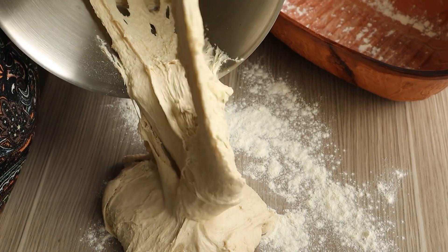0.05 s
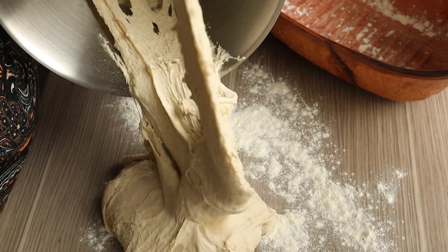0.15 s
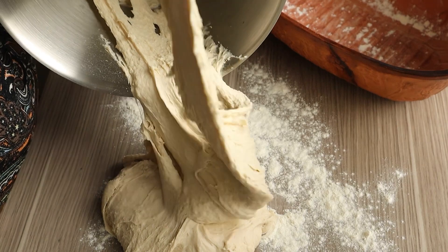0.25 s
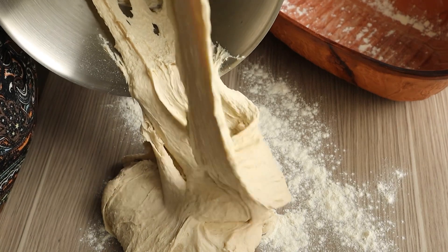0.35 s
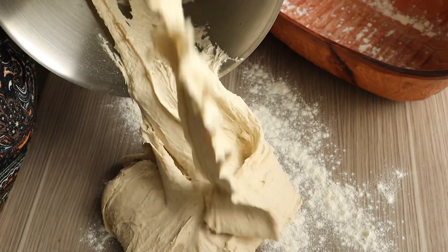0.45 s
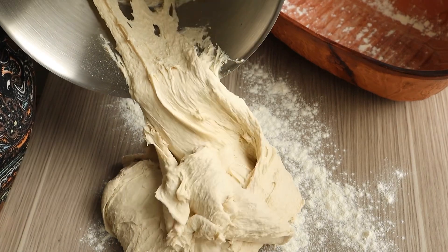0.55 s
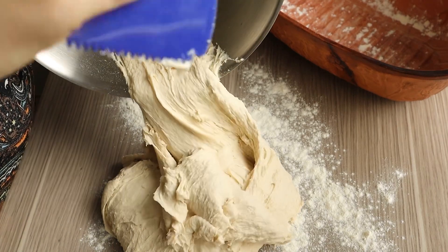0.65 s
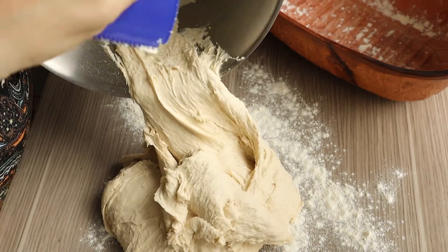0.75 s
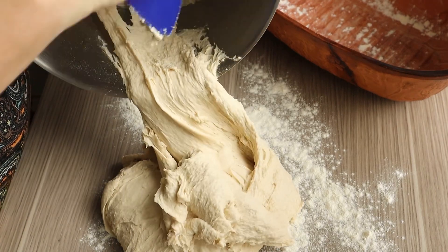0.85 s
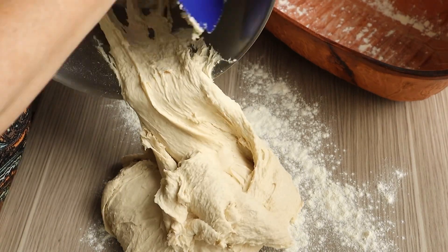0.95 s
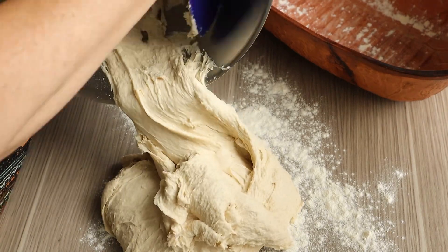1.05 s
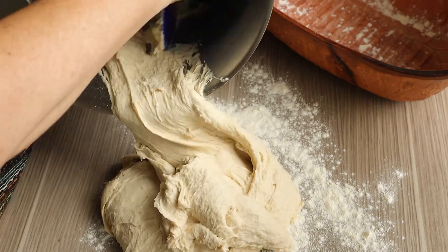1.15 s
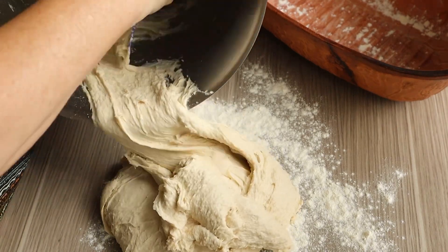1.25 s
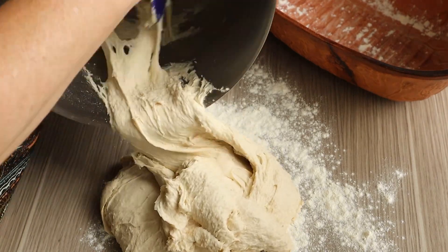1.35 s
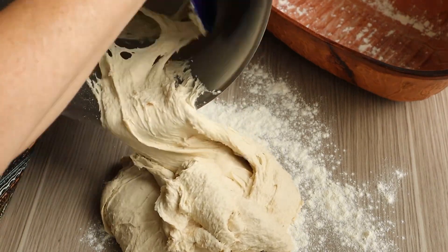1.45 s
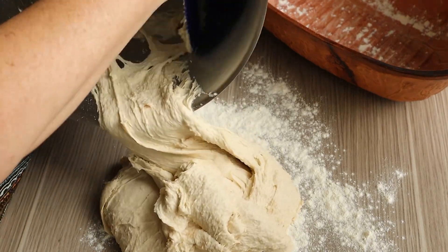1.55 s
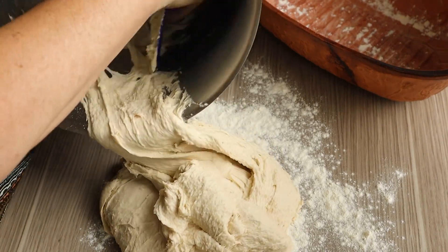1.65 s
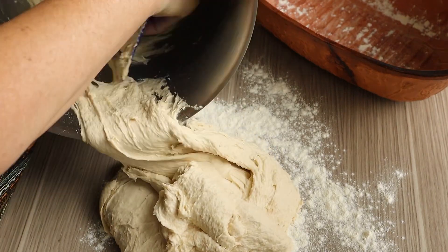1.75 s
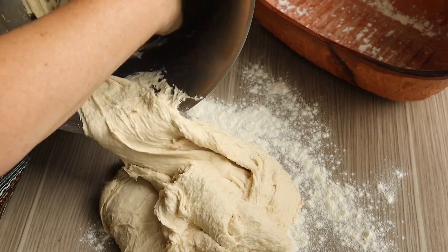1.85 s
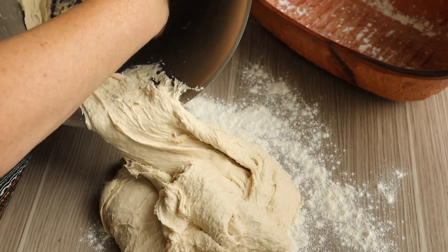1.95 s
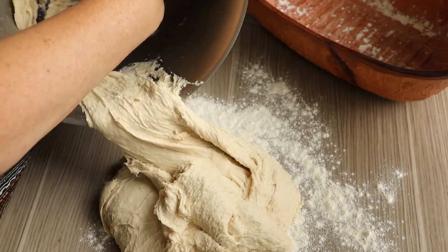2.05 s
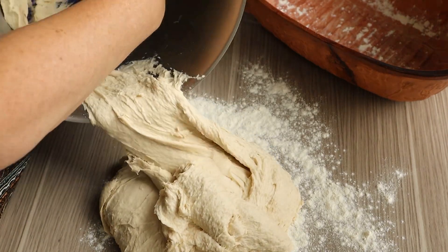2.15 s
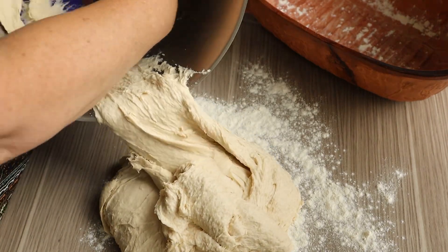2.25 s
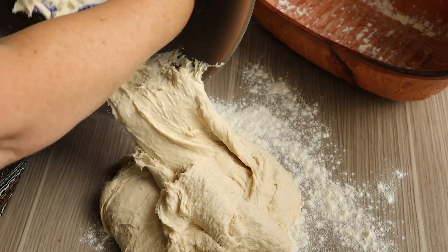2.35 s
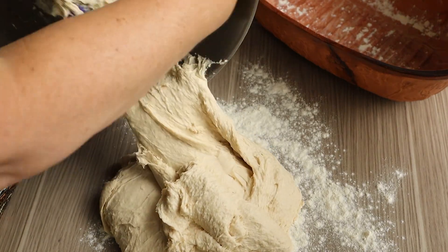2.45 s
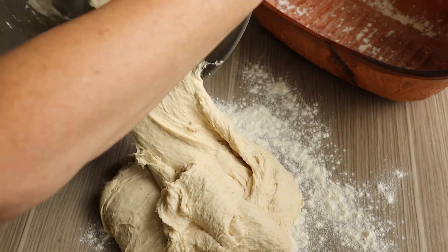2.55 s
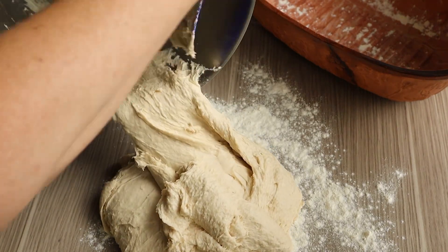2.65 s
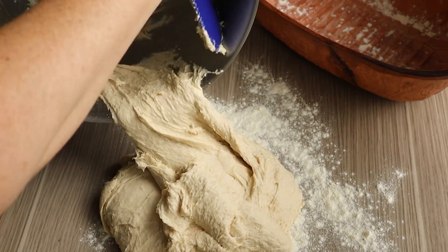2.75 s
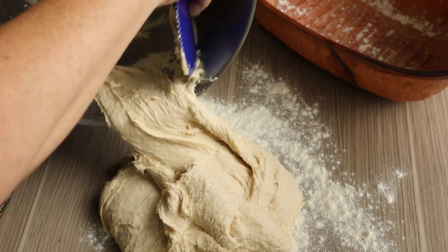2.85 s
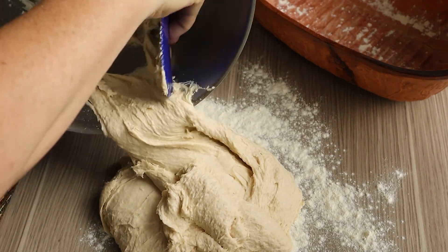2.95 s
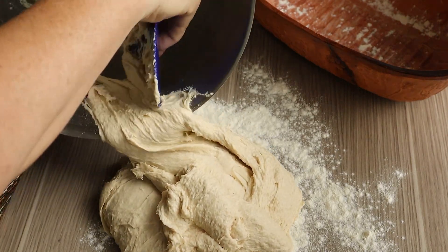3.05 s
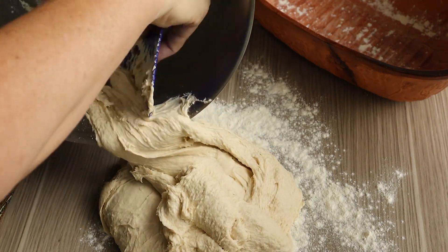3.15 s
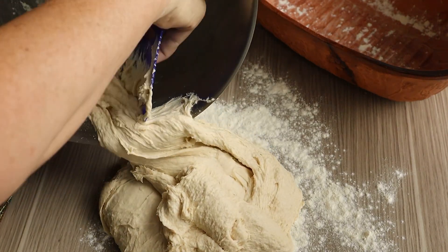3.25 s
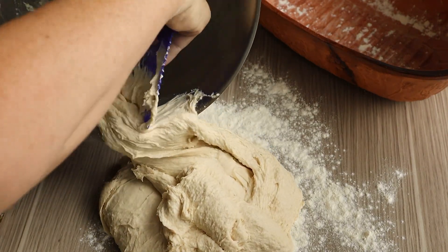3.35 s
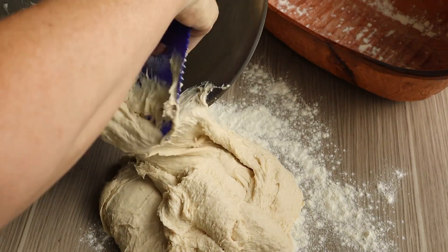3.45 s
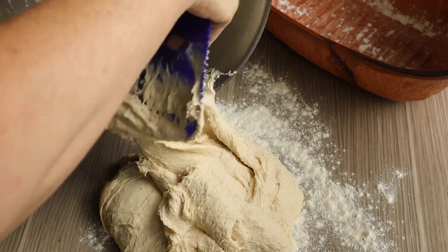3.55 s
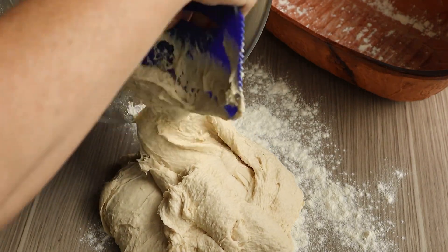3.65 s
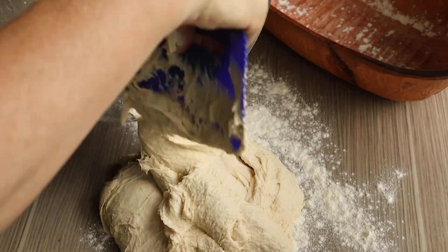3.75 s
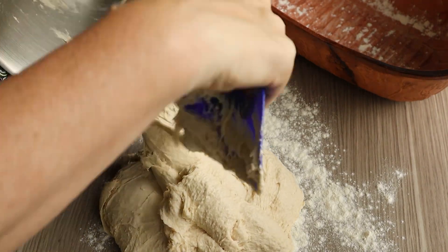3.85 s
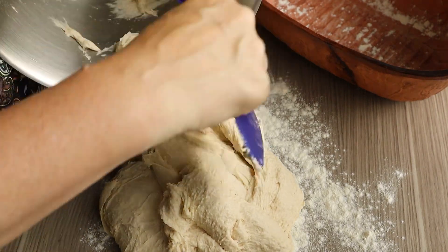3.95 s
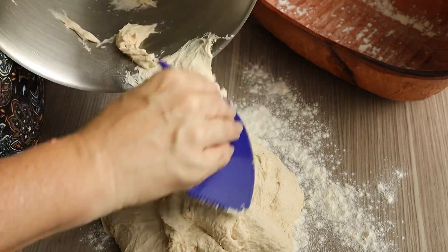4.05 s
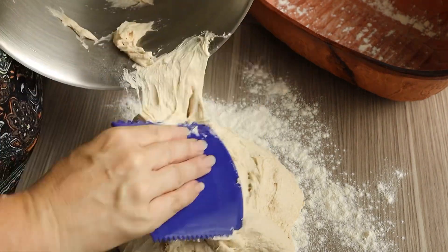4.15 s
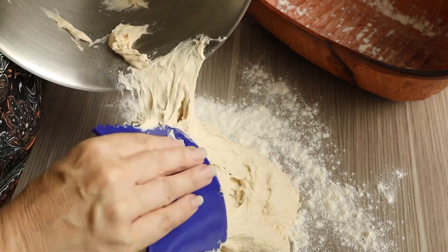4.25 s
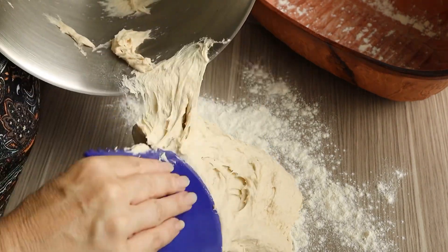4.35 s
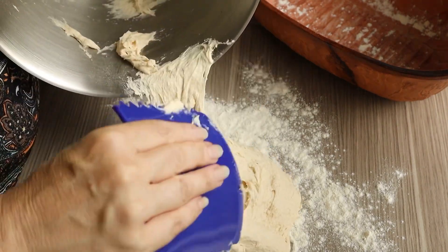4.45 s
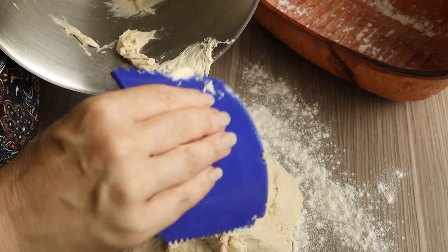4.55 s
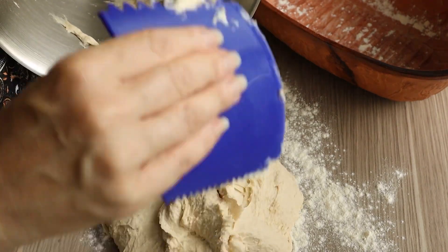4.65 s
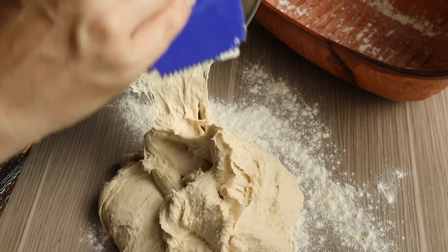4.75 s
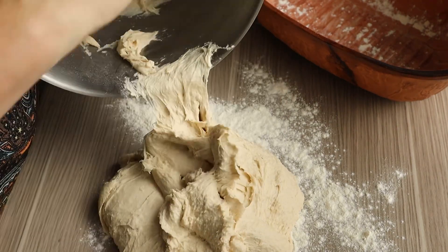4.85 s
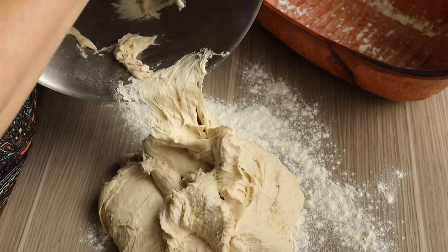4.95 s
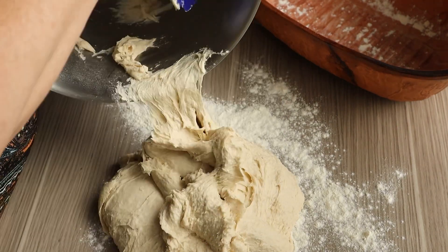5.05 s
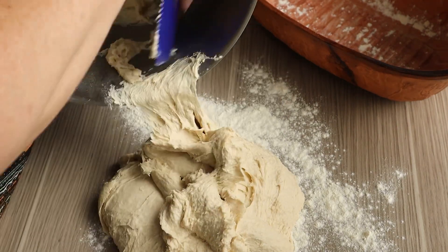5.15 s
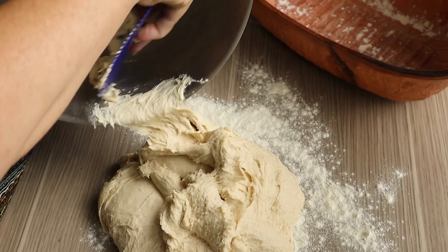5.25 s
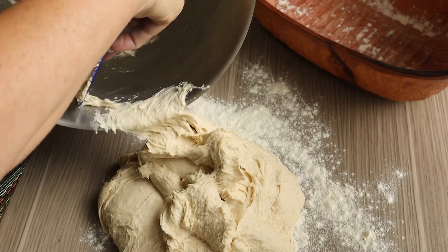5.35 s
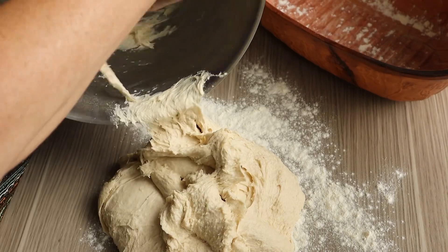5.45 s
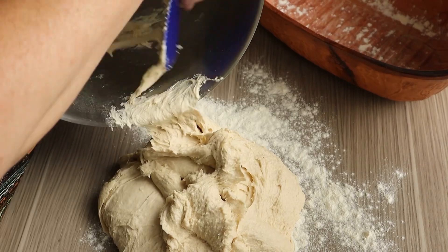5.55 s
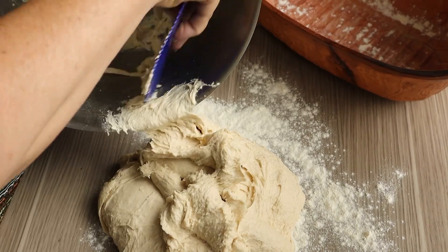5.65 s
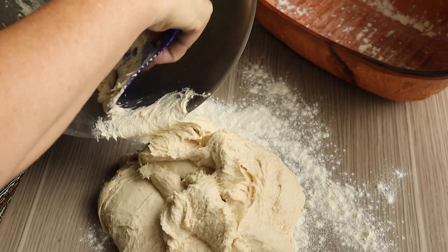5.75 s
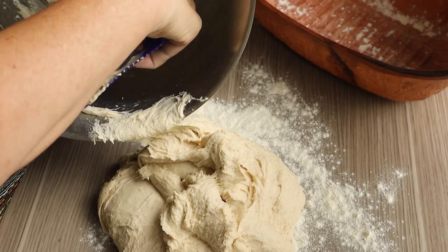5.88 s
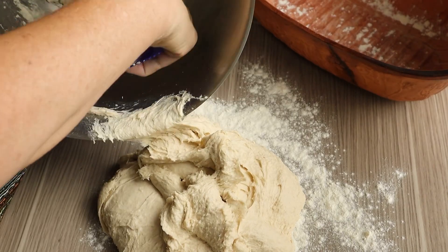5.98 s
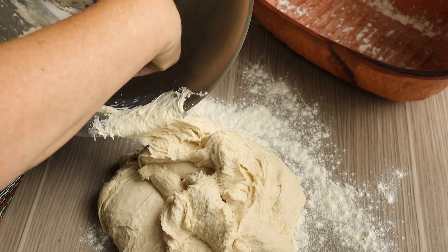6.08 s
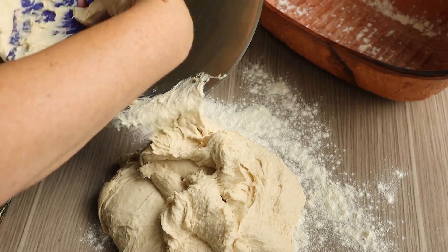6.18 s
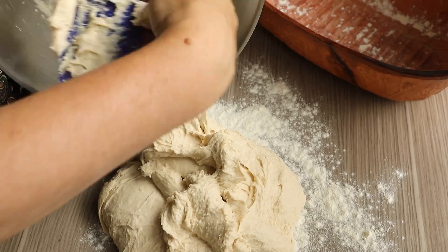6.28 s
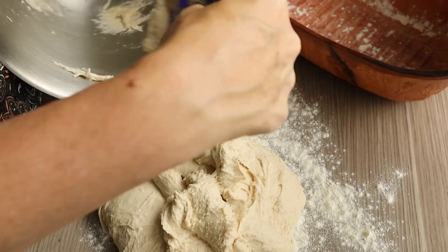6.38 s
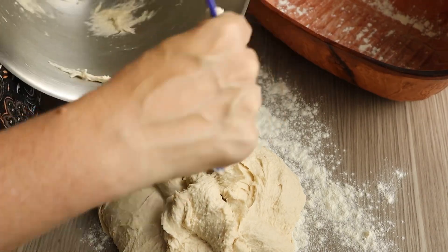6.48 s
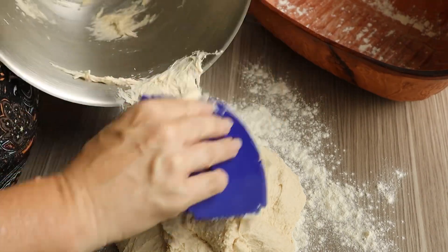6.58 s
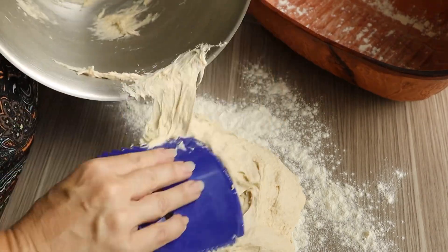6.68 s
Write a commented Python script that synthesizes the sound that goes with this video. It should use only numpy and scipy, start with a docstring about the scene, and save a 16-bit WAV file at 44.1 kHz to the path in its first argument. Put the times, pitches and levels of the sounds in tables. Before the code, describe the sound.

Close stereo pickup of dough being cleared from a thin steel bowl. First a soft thud and sticky tick on wood, then sharp knocks and grainy metallic scrapes, some wavering into rough notes. The longest scrape carries a faint deep shudder. The dough quietly squelches and crackles, then two more knock-and-scrape strokes come before a final wet press. Short room reflections and low air noise surround everything.

```python
"""A lump of sticky dough slaps down on a wooden table in a small kitchen, with a few wet ticks.
A scraper then clears a steel bowl: its blade knocks on the steel and drags along it in tiny random slips,
and both ring the same bowl modes. Between strokes the bowl groans once in the grip; a deep shudder follows.
Later the dough squelches and crackles (filtered random clicks), two more strokes follow, and a last squelch.
A faint crackle goes on from the slap to the end; coloured noise makes a steady room hush throughout."""
import sys
import numpy as np
from scipy import signal
from scipy.fft import rfft, irfft
from scipy.io import wavfile
from scipy.ndimage import uniform_filter1d

SR = 44100
rng = np.random.default_rng(int(sys.argv[2]) if len(sys.argv) > 2 else 0)


def log_audio(samples):
    """Write samples as a 16-bit WAV file to the path given in sys.argv[1]."""
    # one column per channel
    frames = np.atleast_2d(samples).T
    # limit to full scale, then quantise
    limited = np.clip(frames, -1, 1)
    pcm = np.round(limited * 32767).astype(np.int16)
    wavfile.write(sys.argv[1], SR, pcm)


N = 296352
T = np.arange(N) / SR  # seconds
FREQ = np.maximum(np.arange(N // 2 + 1) * SR / N, 1)  # Hz, kept above 0 for the log axis

# Modes of the bowl, damped by hand and dough.
# Each row: pitch in Hz, width in Hz, height in dB over the shell response.
BOWL_MODES = [(159, 19, 19), (312, 3.3, 6), (345.4, 16, 19.5), (536, 34, 13.5), (702, 45, 15.5),
              (905, 54, 12.5), (1044, 98, 11.5), (1118, 79, 13.5), (1308, 19, 9), (1590, 166, 9.5),
              (1620, 40, 0), (1958, 25, 11), (2189, 40, 7), (2368, 21, 6.5), (2573, 23, 8), (2684, 54, 6.5),
              (3002, 51, 8), (3540, 69, 6), (3900, 60, 0.5), (4310, 54, 1), (5120, 110, -2),
              (5260, 100, -4), (6780, 430, -1), (7520, 460, -1)]
# Dense response of the thin steel shell. Each row: frequency in Hz, response in dB.
SHELL_RESPONSE = [(50, -35.5), (120, -6), (220, -1), (430, -0.5), (620, -2.5), (1200, 1), (2600, 2),
                  (5000, 1), (8200, -1), (9500, -5), (12000, -9), (15000, -46)]
# Stereo width of the bowl and dough. Each row: frequency in Hz, gain of the side signal in dB.
BOWL_SIDE = [(150, -27), (400, -14), (1000, -5.5), (2000, 0.5), (4000, 4), (8000, 4.5), (12000, 11.5)]
# Strokes of the blade, one list a stroke; levels before the settings in scraping().
# Each row: time in seconds, bite of the edge in dB, pressure on the wall in dB.
BLADE_STROKES = [
    [(1.06, -33, -35), (1.106, -33, -44), (1.148, -35.5, -46), (1.166, -35.5, -40), (1.248, -54, -44),
     (1.278, -46.5, -51), (1.3, -57, -66)],
    [(1.6, -48, -58), (1.63, -38.5, -46), (1.655, -38.5, -40), (1.695, -50, -44.5), (1.74, -46.5, -38),
     (1.78, -46.5, -46), (1.888, -38, -39.5), (2.008, -52, -53), (2.1, -58, -50.5)],
    [(2.13, -56, -50), (2.282, -48, -45), (2.292, -50.5, -47), (2.326, -36.5, -40.5), (2.406, -57.5, -62),
     (2.44, -54, -71)],
    [(2.79, -43, -52), (2.815, -38.5, -45), (2.868, -37, -34), (2.908, -33.5, -39), (3.002, -52, -47.5),
     (3.13, -47, -44.5), (3.24, -48, -46.5), (3.276, -45, -46), (3.48, -43, -37.5), (3.52, -47.5, -52),
     (3.58, -59, -68)],
    [(5.18, -35.5, -52), (5.206, -34, -39), (5.256, -47.5, -40.5), (5.282, -35.5, -39.5), (5.334, -40, -40),
     (5.41, -61.5, -52.5)],
    [(5.68, -41, -50.5), (5.862, -44.5, -41.5), (5.9, -47.5, -53), (5.946, -42, -41.5), (5.99, -50.5, -51),
     (6.086, -38, -38), (6.155, -43, -46), (6.174, -38, -43), (6.19, -43.5, -57), (6.26, -68, -76)],
]
# Each stroke meets another part of the wall.
# Each row: rumble in dB over the pressure, rasp in dB over the bite, hiss in dB over the bite.
STROKE_BALANCE = [(-4, -2, -5), (-12, -2, -5.5), (-4.5, -4.5, -0.5), (-7, -4.5, -3.5), (-11.5, -1.5, -5),
                  (-11, -3.5, -3)]
# Resonances brought out where the blade presses, one list a stroke.
# Each row: pitch in Hz, width in Hz, height in dB.
STROKE_RESONANCES = [
    [(736, 56, 1), (1970, 50, 3), (2360, 130, 6), (2960, 90, 6.5), (3730, 400, 1.5)],
    [(940, 56, 10), (1420, 130, 6.5), (2670, 60, -5)],
    [(930, 74, 6), (1460, 130, 3), (2590, 310, 4)],
    [(760, 90, 2.5), (960, 110, 4.5), (1580, 72, 2.5), (1880, 150, 2), (2690, 43, -1), (3050, 140, 3.5)],
    [(738, 90, 6.5), (1540, 110, -2), (1950, 63, 2.5), (2600, 81, -4), (2905, 62, 6.5)],
    [(910, 230, 5), (1550, 90, 5.5), (2650, 75, -1), (3060, 210, 4.5)],
]
# Knocks on the bowl; thump, body and tick are levels before the settings in knocks().
# Each row: start in seconds, thump in dB, body in dB, tick in dB, main pitch of the struck spot in Hz,
# contact ring in seconds to fall 60 dB, boom in dB, favoured ring in Hz, ring in dB.
BOWL_KNOCKS = [(1.0471, -38.5, -61, -30, 2300, 0.15, -45, 2700, -45),
               (1.1647, -45, -38.5, -31.5, 1110, 0.26, -35.5, 2000, -32),
               (1.5178, -36.5, -22, -21.5, 1530, 0.094, -38, 2960, -21.5),
               (2.2922, -56, -43, -59, 950, 0.052, -61, 1020, -37),
               (2.7732, -44.5, -64, -54, 1130, 0.11, -44, 1020, -62),
               (5.071, -52, -39, -62, 1200, 0.047, -56, 1020, -48),
               (5.1514, -32.5, -30.5, -27, 1060, 0.15, -50, 2600, -38),
               (5.6348, -32.5, -29.5, -36, 1080, 0.34, -30, 1860, -25)]
# The hollow of the bowl booms after a shove. Each row: pitch in Hz, level in dB, seconds to fall 60 dB.
HOLLOW_BOOM = [(305.4, -2, 0.17), (358, 0.5, 0.11)]
# Modes of the free wall after a knock. Each row: pitch in Hz, level in dB, seconds to fall 60 dB.
WALL_RING = [(1023, -4, 0.22), (1270, 0, 0.26), (1943, 0, 0.25), (2207, -7, 0.13), (2600, -3, 0.3),
             (2751, -1, 0.15), (2972, -6, 0.22), (3580, -5, 0.17)]
# The blade judders on one bowl mode.
# Each row: centre in seconds, length in seconds, mode in Hz, level in dB.
BLADE_JUDDERS = [(1.097, 0.0235, 1986, -32.5), (1.177, 0.018, 1058, -42), (1.206, 0.02, 964, -41.5),
                 (1.242, 0.02, 938, -41.5), (1.97, 0.11, 1533, -54.5), (2.17, 0.098, 1524, -54.5),
                 (2.224, 0.06, 919, -52), (2.862, 0.054, 737, -44), (2.891, 0.044, 1989, -37),
                 (3.418, 0.066, 732, -49.5), (4.874, 0.009, 1720, -48.5), (5.826, 0.05, 3054, -43.5),
                 (5.978, 0.087, 950, -45.5), (6.11, 0.071, 1500, -46)]
# The note that the bowl holds under the second stroke. Each row: time in seconds, pitch in Hz, level in dB.
HELD_NOTE = [(1.735, 925, -38.5), (1.765, 920, -45), (1.83, 925, -43.5), (1.868, 917, -46),
             (1.898, 913, -36.5), (1.97, 918, -45), (2.04, 930, -52), (2.08, 915, -48), (2.124, 921, -53)]
# The dough slapping down on the table. Each row: frequency in Hz, relative level in dB per Hz.
SLAP_SPECTRUM = [(60, -33), (160, 1.5), (350, 0), (450, -5), (560, -1), (930, 0), (1250, 4.5), (2000, -6),
                 (2800, -18), (7500, -25), (13000, -68)]
# Dough pressed and torn; levels before the settings in dough().
# Each row: fullest moment in seconds, pitch of the squelch in Hz, squelch in dB, crackle in dB.
DOUGH_SQUEEZES = [(4.44, 690, -47.5, -61.5), (4.495, 646, -59, -57), (4.868, 1500, -53.5, -67),
                  (6.644, 1460, -56, -84)]
# Short ticks, mostly where sticky dough lands, is touched or snaps; the one at 5.071 s is the crisp tick of a
# knock on the bowl. # Each row: start in seconds, level in dB before the setting in dough().
SHORT_TICKS = [(0.545, -46), (0.559, -35.5), (0.5732, -23.5), (2.5865, -35), (4.77, -39), (4.857, -44),
               (4.875, -41.5), (4.9453, -43), (5.071, -32.5), (6.64, -49)]
# Tone of those ticks. Each row: frequency in Hz, relative level in dB per Hz.
SNAP_SPECTRUM = [(500, 18), (2000, 2.5), (7000, 3), (12000, -4), (16000, -28)]
# Room air. Each row: frequency in Hz, relative level in dB per Hz.
AIR_SPECTRUM = [(20, 1.5), (33, -21), (52, 8.5), (75, 0.5), (110, 0.5), (170, -0.5), (400, -5.5),
                (800, -8.5), (1500, -14), (3000, -18.5), (6000, -28), (9500, -33.5), (12500, -34.5),
                (15000, -59)]
# Stereo width of the air. Each row: frequency in Hz, gain of the side signal in dB.
AIR_SIDE = [(60, -17), (110, -6), (200, 0), (380, 4.5), (700, 3.5), (1290, 5), (2380, 5), (4400, 5.5),
            (8120, 7), (15000, 13)]

# where the low body, the middle ring, the rasp and the hiss of the steel meet, and where all sound is cut
LOW_HZ, RASP_HZ, HISS_HZ, TOP_HZ = 830, 1780, 4200, 15300
# a harder bite is brighter: dB of hiss gained over the rasp for each dB above an ordinary bite
BRIGHTENING, ORDINARY_BITE_DB = 0.6, -41.5
RING_FALL_DB_PER_OCTAVE = 30  # modes far from the favoured one ring less
BOWL_LEAN = 0.086  # share by which the bowl is louder on the right and softer on the left
GROAN_S, GROAN_LENGTH_S, GROAN_HZ, GROAN_SAG_HZ_PER_S, GROAN_DB = 2.579, 0.029, 343, 980, -37
SLAP_S, SLAP_DB = 0.5715, -24.5
SQUEEZE_RISE_S, SQUEEZE_T60 = 0.034, 0.22
SQUELCH_SPREAD = 1.62  # ratio of the band's edges to its pitch
SHUDDER_S, SHUDDER_LENGTH_S, SHUDDER_HZ, SHUDDER_DB = 3.3, 0.24, 31.7, -51
HUSH_DB = -53


def undb(db):
    """Decibels to gain."""
    return 10 ** (np.asarray(db) / 20)


def unit(x):
    """Scale a (mid, side) pair so that the mid has rms 1."""
    return x / np.sqrt(np.mean(x[0] ** 2))


def spectrum(points):
    """dB at every frequency, joined on a log axis."""
    hz, db = np.transpose(points)
    return np.interp(np.log(FREQ), np.log(hz), db)


def peaks(modes):
    """dB response of resonances standing over a flat background."""
    power = sum(undb(db) ** 2 / (1 + (2 * (FREQ - hz) / width) ** 2) for hz, width, db in modes)
    return 10 * np.log10(1 + power)


def colour(x, db):
    """Filter with the given dB response that never sounds early: narrow peaks ring on after the push."""
    n = x.shape[-1]
    log_gain = np.interp(np.arange(n // 2 + 1) * SR / n, FREQ, db) * np.log(10) / 20
    # folding the cepstrum gives the phase that puts the energy as early as possible
    cepstrum = irfft(log_gain, n)
    cepstrum[1:n // 2] *= 2
    cepstrum[n // 2 + 1:] = 0
    return irfft(rfft(x) * np.exp(rfft(cepstrum)), n)


def widen(pair, width):
    """Set the side against the mid, frequency by frequency."""
    return np.array([pair[0], colour(pair[1], spectrum(width))])


def band(x, lo_hz, hi_hz, order=4):
    """Keep only the frequencies between two edges."""
    edges = [lo_hz, min(hi_hz, SR / 2 - 100)]
    return signal.sosfilt(signal.butter(order, edges, "band", fs=SR, output="sos"), x)


def fade(t, t60):
    """Exponential decay, 60 dB down at t60 seconds."""
    return np.exp(-np.log(1000) * t / t60)


def swell(centre_s, length_s):
    """Bell-shaped rise and fall."""
    return np.exp(-2 * ((T - centre_s) / length_s) ** 2)


def envelope(s, db, onset_s=0.01, release_s=0.04):
    """Gain over time of one gesture from its dB curve, silent before and after."""
    gate = np.interp(T, [s[0] - onset_s, s[0], s[-1], s[-1] + release_s], [0, 1, 1, 0])
    return undb(np.interp(T, s, db)) * gate


def walk(rate):
    """Smooth random wander with a spread of 1, from random steps at the given rate per second."""
    size = int(SR / rate)
    steps = np.repeat(rng.standard_normal(N // size + 1), size)
    smooth = uniform_filter1d(uniform_filter1d(steps, size), size)[:N]
    return smooth / smooth.std()


def slips(rate, spread_db):
    """Random tiny clicks of uneven size, about `rate` a second, as mid and side."""
    happens = rng.random(N) < rate / SR
    sizes = happens * undb(abs(spread_db) * np.clip(rng.standard_normal(N), -2, 2))
    return unit(sizes * rng.standard_normal((2, N)))


def tone(phase, side_db=-3, lead=0.62):
    """One mode of the wall as mid and side: it reaches the two ears out of step."""
    return np.array([np.sin(phase), -undb(side_db) * np.cos(phase + lead)])


def bowl(push, contact=()):
    """The steel's answer to a push: its modes and those of the contact, over the dense shell response."""
    response = spectrum(SHELL_RESPONSE) + peaks(BOWL_MODES) + peaks(contact)
    return widen(colour(push, response), BOWL_SIDE)


def patchy(steel, lo_hz, hi_hz, patchy_db=1.2, count=5):
    """The moving contact favours now one group of modes, now another."""
    edges = np.geomspace(lo_hz, hi_hz, count + 1)
    whole = rfft(steel)
    groups = (irfft(whole * ((FREQ >= lo) & (FREQ < hi)), N) for lo, hi in zip(edges, edges[1:]))
    return unit(sum(group * undb(patchy_db * walk(rate=45)) for group in groups))


def scraping(press_db=-5.5, grip_db=1.0, catch_db=1.0):
    """The blade slips unevenly: pressure drives the low modes, the edge's bite the rasp and hiss."""
    unevenness = undb(grip_db * walk(rate=130) + catch_db * walk(rate=40))
    steel = bowl(slips(rate=7000, spread_db=-1.5) * unevenness)
    rumble = unit(band(steel, 245, LOW_HZ))
    body = patchy(steel, LOW_HZ, RASP_HZ, count=3)
    rasp = patchy(steel, RASP_HZ, HISS_HZ)
    hiss = patchy(steel, HISS_HZ, TOP_HZ)
    out = np.zeros((2, N))
    for rows, balance, modes in zip(BLADE_STROKES, STROKE_BALANCE, STROKE_RESONANCES):
        s, bite, pressure = np.transpose(rows)
        rumble_db, rasp_db, hiss_db = balance
        bright = hiss_db + BRIGHTENING * (bite - ORDINARY_BITE_DB)
        stroke = (body + undb(rumble_db) * rumble) * envelope(s, pressure + press_db)
        stroke += rasp * envelope(s, bite + rasp_db)
        stroke += hiss * envelope(s, bite + bright)
        out += colour(stroke, peaks(modes))
    return out


def ring(favoured_hz):
    """The free wall rings on after a knock, most strongly in the modes near the favoured one."""
    t = T[:SR]
    out = np.zeros((2, SR))
    for hz, db, t60 in WALL_RING:
        octaves_away = abs(np.log2(hz / favoured_hz))
        gain = undb(db - RING_FALL_DB_PER_OCTAVE * octaves_away)
        out += gain * fade(t, t60) * tone(2 * np.pi * hz * t)
    return out


def knocks(thump_db=0, body_db=-3, tick_db=-3, spot_db=5, buzz_db=-19, buzz_t60=0.46,
           crack_db=2, crack_t60=0.056, thump_t60=0.0022, size=1323):
    """Each knock shoves the whole bowl and cracks on the thin wall, which buzzes on the blade and rings."""
    out, t = np.zeros((2, N)), T[:SR]
    shove = fade(t, thump_t60) * np.cos(2 * np.pi * 210 * t) * np.ones((2, 1))
    whole = band(bowl(shove), 98, LOW_HZ)
    hollow = sum(undb(db) * tone(2 * np.pi * hz * t, side_db=-19) * fade(t, t60)
                 for hz, db, t60 in HOLLOW_BOOM)
    for s, thump, body, tick, spot_hz, t60, boom, ring_hz, ring_db in BOWL_KNOCKS:
        contact = undb(crack_db) * fade(t, crack_t60) + fade(t, t60) + undb(buzz_db) * fade(t, buzz_t60)
        wall = bowl(contact * rng.standard_normal((2, SR)), [(spot_hz, spot_hz / 2, spot_db)])
        parts = [(whole, thump + thump_db),
                 (band(wall, 740, 2200), body + body_db),
                 (band(wall, 2200, TOP_HZ), tick + tick_db)]
        # each part is levelled by its first `size` samples
        hit = sum(undb(db) * x / np.std(x[0, :size]) for x, db in parts)
        hit = hit + undb(boom) * hollow + undb(ring_db) * ring(ring_hz)
        start = int(s * SR)
        out[:, start:start + SR] += hit[:, :N - start]
    return out


def judder(level_db=0, flutter_db=3.0, wander_hz=30, wander_at_hz=950):
    """Slips lock loosely onto one mode and make it sing roughly for a moment."""
    out = np.zeros((2, N))
    drift = wander_hz * walk(rate=400)
    flutter = undb(flutter_db * walk(rate=110))
    for s, length, hz, db in BLADE_JUDDERS:
        near = np.abs(T - s) < 2 * length
        pitch = hz + drift[near] * np.sqrt(hz / wander_at_hz)  # higher modes wander more
        note = unit(tone(2 * np.pi * np.cumsum(pitch) / SR))
        out[:, near] += note * undb(db + level_db) * swell(s, length)[near]
    return out * flutter


def sing(flutter_db=2.8, wander_hz=27):
    """The slips stay locked to one mode and the bowl holds a rough, wavering note."""
    s, hz, db = np.transpose(HELD_NOTE)
    pitch = np.interp(T, s, hz) + wander_hz * walk(rate=380)
    note = unit(tone(2 * np.pi * np.cumsum(pitch) / SR))
    return note * envelope(s, db, onset_s=0.01, release_s=0.017) * undb(flutter_db * walk(rate=90))


def groan(overtone_db=-22, side_db=-14, throb_db=3, throb_hz=45):
    """The bowl shifts in the grip: a short, hollow, throbbing low tone that sags in pitch."""
    age = np.clip(T - GROAN_S, 0, GROAN_LENGTH_S)
    phase = 2 * np.pi * np.cumsum(GROAN_HZ - GROAN_SAG_HZ_PER_S * age) / SR
    ends = [GROAN_S, GROAN_S + GROAN_LENGTH_S]
    rub = envelope(ends, [GROAN_DB, GROAN_DB], onset_s=0.0011, release_s=0.011)
    throb = undb(throb_db * np.sin(2 * np.pi * throb_hz * age))
    note = (np.sin(phase) + undb(overtone_db) * np.sin(2 * phase)) * rub * throb
    return np.array([note, undb(side_db) * note])


def slap(smack_t60=0.015, settle_db=-8, settle_t60=0.26, side_db=-5):
    """The lump lands with a dull smack, then spreads and settles on the wood: noise with two decays."""
    age = T - SLAP_S
    smack = fade(np.abs(age), smack_t60)
    settle = undb(settle_db) * fade(np.abs(age), settle_t60)
    force = (age >= 0) * (smack + settle)
    response = spectrum(SLAP_SPECTRUM)
    thud = colour(force * rng.standard_normal((2, N)), response) / np.sqrt(np.mean(undb(response) ** 2))
    return undb(SLAP_DB) * thud * np.array([[1], [undb(side_db)]])


def dough(squelch_db=-2, crackle_db=-4, snap_db=-9, snap_t60=0.052, cling_db=-75):
    """Wet dough squelches under the blade; threads part in a fine crackle, with some louder short ticks, one of
    them a knock on the bowl."""
    pops = slips(rate=1900, spread_db=2.5)
    crackle = unit(band(slips(rate=3400, spread_db=-3), 4100, 12500, order=3))
    squeezes = np.zeros((2, N))
    for s, hz, wet, fine in DOUGH_SQUEEZES:
        squelch = unit(band(pops, hz / SQUELCH_SPREAD, hz * SQUELCH_SPREAD, order=2))
        press = np.where(T < s, swell(s, SQUEEZE_RISE_S), fade(np.abs(T - s), SQUEEZE_T60))
        squeezes += (undb(wet + squelch_db) * squelch + undb(fine + crackle_db) * crackle) * press
    # from the slap on, the dough keeps peeling faintly off the steel
    cling = unit(band(slips(rate=8600, spread_db=11), 4200, 7900)) * undb(cling_db) * (T > SLAP_S)
    bursts = sum(undb(db + snap_db) * (T >= s) * fade(np.abs(T - s), snap_t60) for s, db in SHORT_TICKS)
    snaps = unit(colour(rng.standard_normal((2, N)), spectrum(SNAP_SPECTRUM))) * bursts
    return widen(squeezes + cling + snaps, BOWL_SIDE)


def shudder(wander_hz=4):
    """A deep wavering rumble under the fourth stroke, the same in both ears."""
    pitch = SHUDDER_HZ + wander_hz * walk(rate=23)
    rumble = np.sin(2 * np.pi * np.cumsum(pitch) / SR)
    return np.array([rumble * undb(SHUDDER_DB) * swell(SHUDDER_S, SHUDDER_LENGTH_S), np.zeros(N)])


def kitchen(pair, wet_db=-7, middle_t60=0.49, high_t60=0.51, gap_s=0.0021, bass_db=-4, bass_t60=0.37):
    """Hard walls close by: a short diffuse tail of fading noise, driest in the bass."""
    t = T[:SR]
    bass, middle, treble = rng.standard_normal((3, 2, SR))
    tail = undb(bass_db) * band(bass, 89, 520, order=2) * fade(t, bass_t60)
    tail += band(middle, 435, 4170, order=2) * fade(t, middle_t60)
    tail += band(treble, 3700, 9800, order=2) * fade(t, high_t60)
    tail *= np.clip(t / gap_s - 1, 0, 1)  # silent for one gap, full after two
    tail /= np.sqrt(np.mean(np.abs(rfft(tail))[:, 500:4000] ** 2))  # average gain 1 from 500 to 4000 Hz
    return pair + undb(wet_db) * signal.fftconvolve(pair, tail, axes=1)[:, :N]


def hush(level_db=0):
    """Steady room air: noise falling towards the treble."""
    air = widen(colour(rng.standard_normal((2, N)), spectrum(AIR_SPECTRUM)), AIR_SIDE)
    return unit(air) * undb(HUSH_DB + level_db)


def scene():
    """All sources as mid and side, the steel a little to the right, opened into left and right."""
    steel = knocks() + scraping() + judder()
    steel = steel - BOWL_LEAN * steel[::-1]
    in_room = kitchen(slap() + steel + groan() + dough())
    mid, side = in_room + sing() + shudder() + hush()
    return np.array([mid + side, mid - side])


def record(dry, balance_db=0.1):
    """The left channel is made a touch louder, peaks are clipped and the top is cut steeply."""
    tilted = dry * undb(np.array([[balance_db], [-balance_db]]) / 2)
    low_pass = signal.ellip(8, .2, 70, TOP_HZ, fs=SR, output="sos")
    return signal.sosfilt(low_pass, np.clip(tilted, -1, 1))


dry = scene()
out = record(dry)
log_audio(out)
```